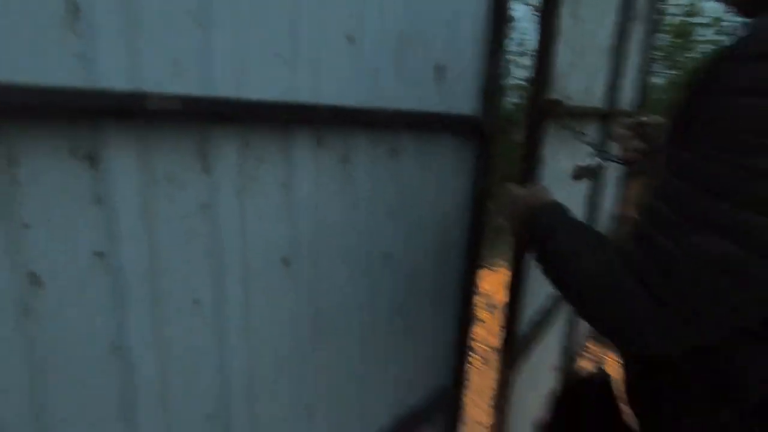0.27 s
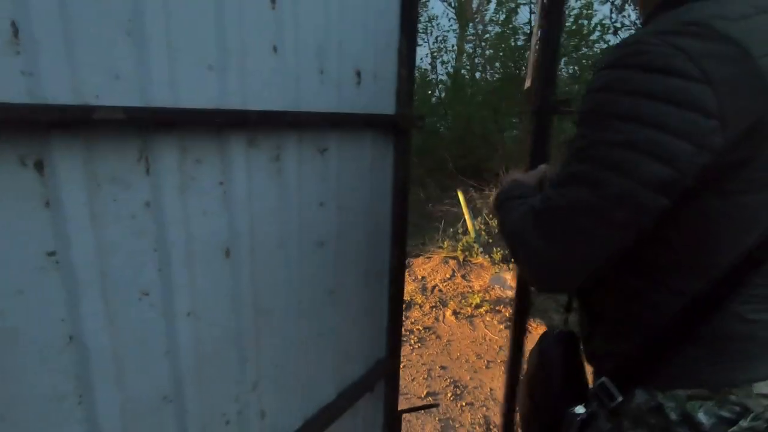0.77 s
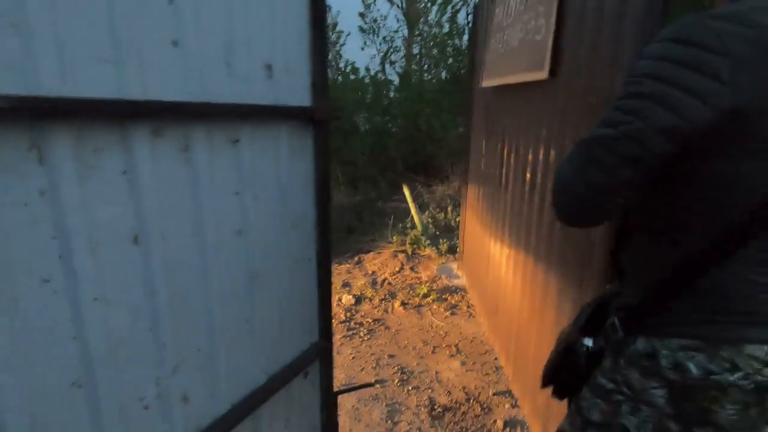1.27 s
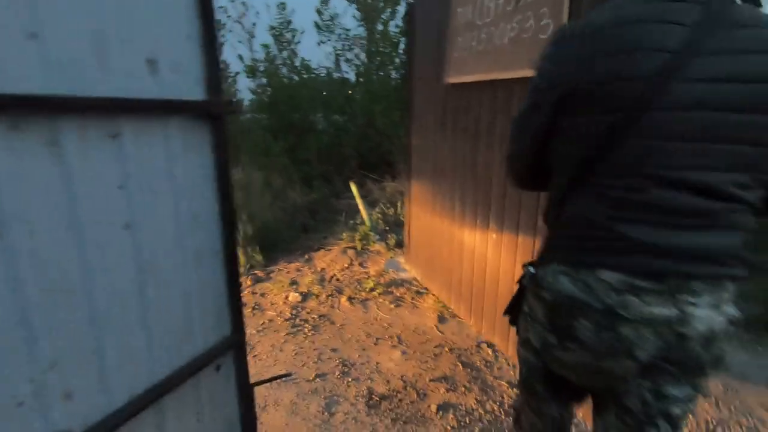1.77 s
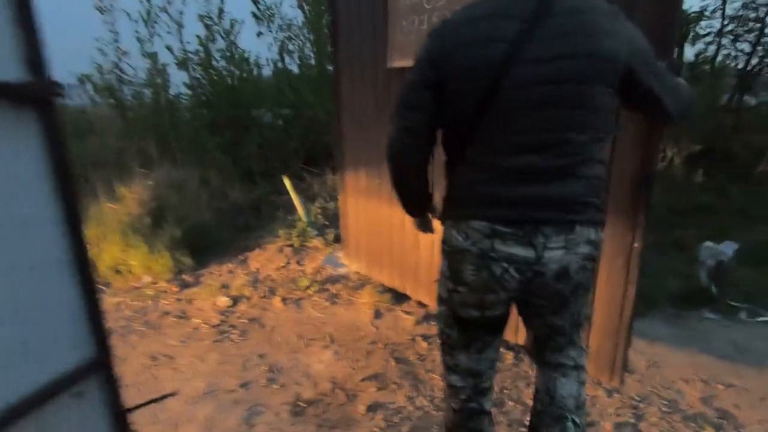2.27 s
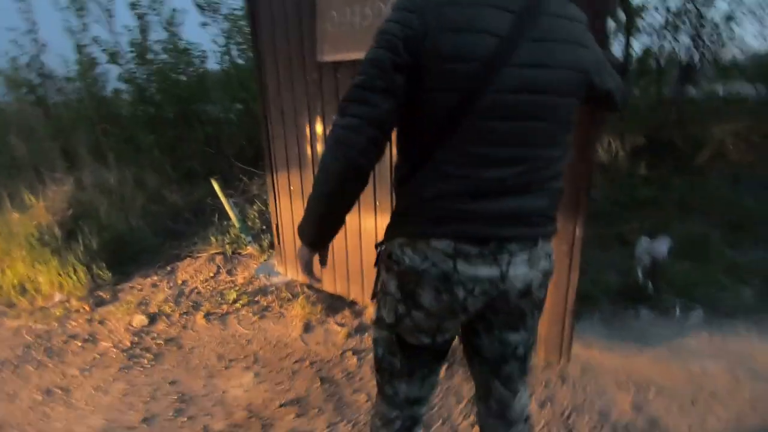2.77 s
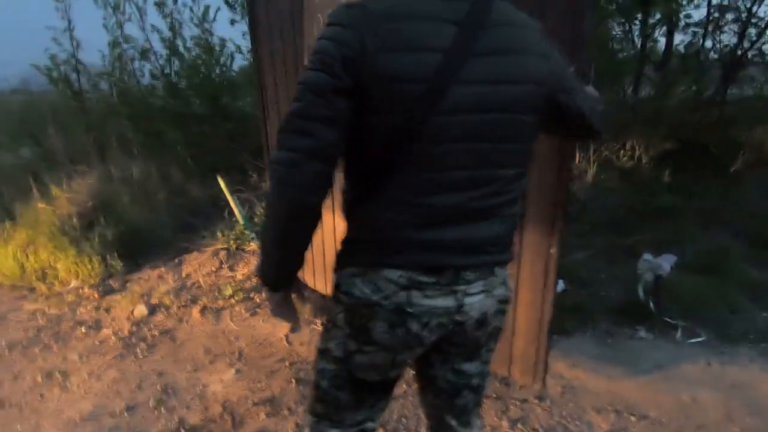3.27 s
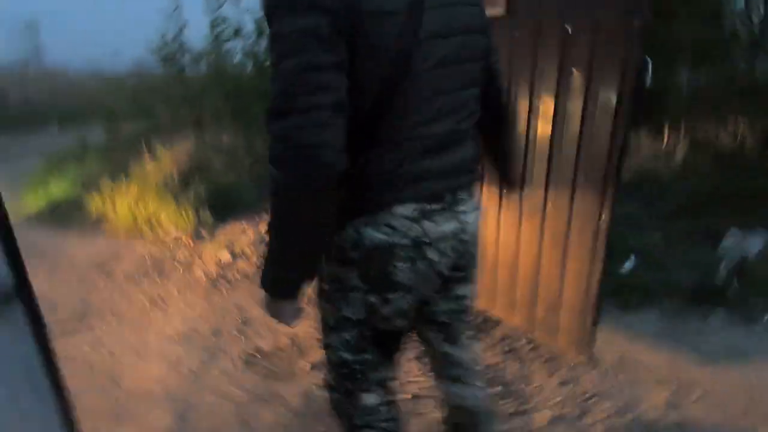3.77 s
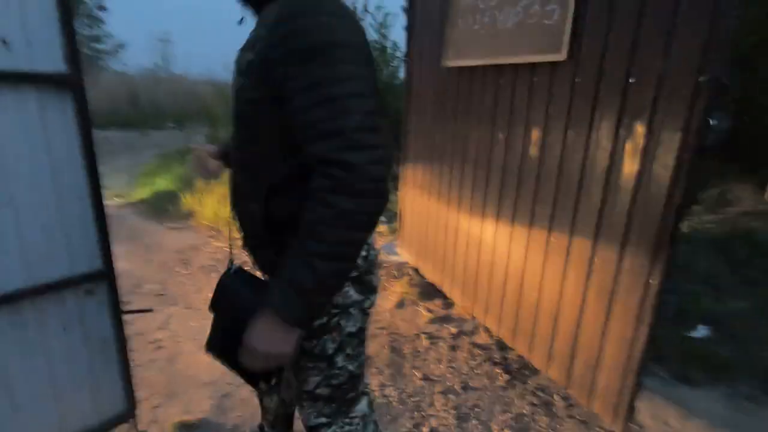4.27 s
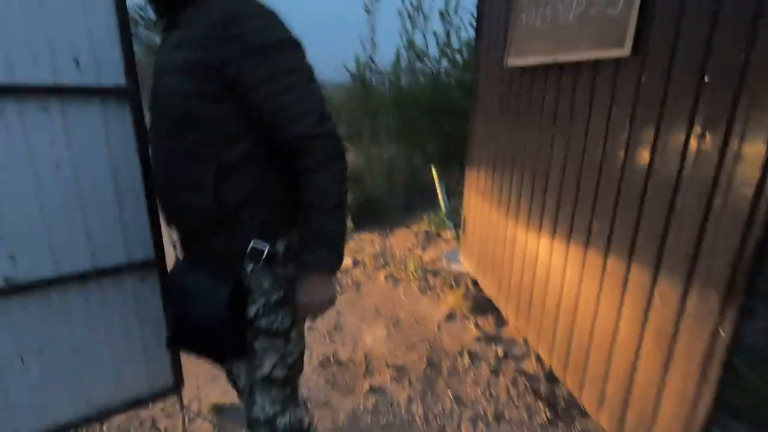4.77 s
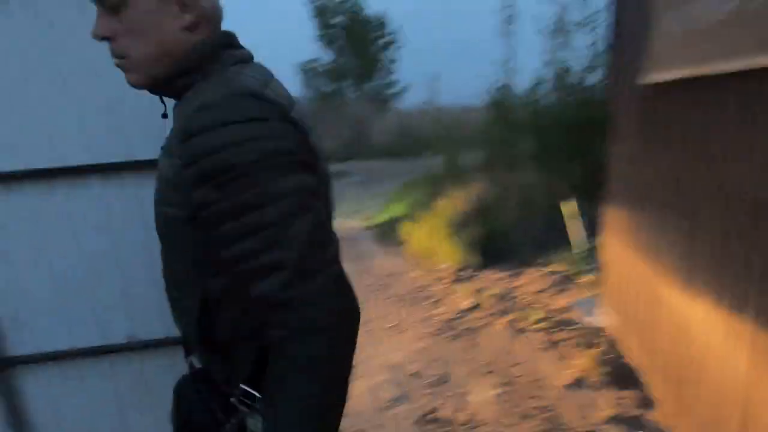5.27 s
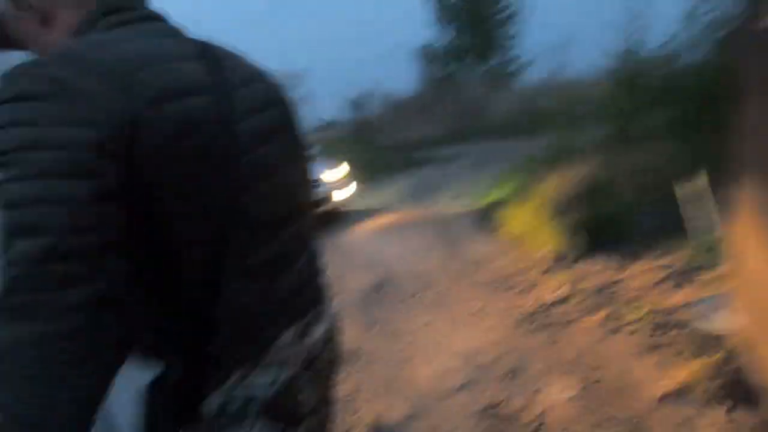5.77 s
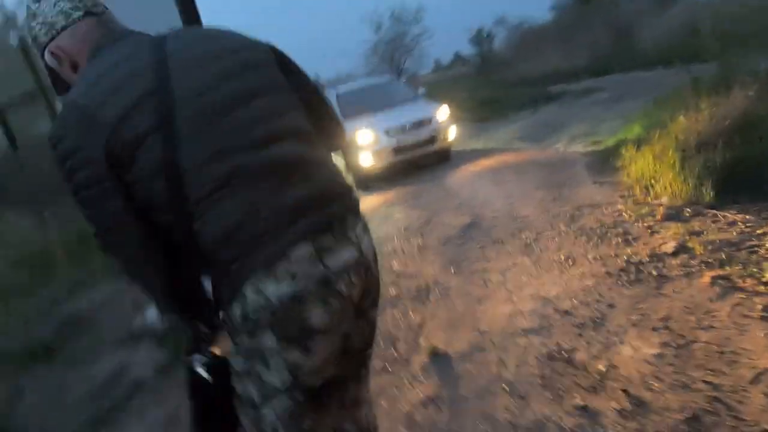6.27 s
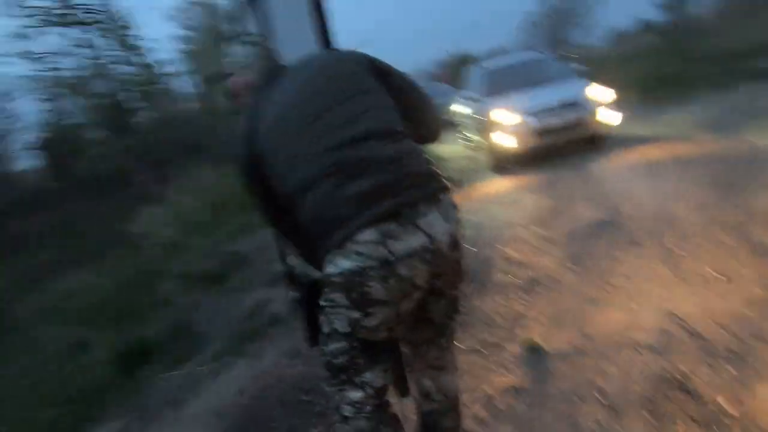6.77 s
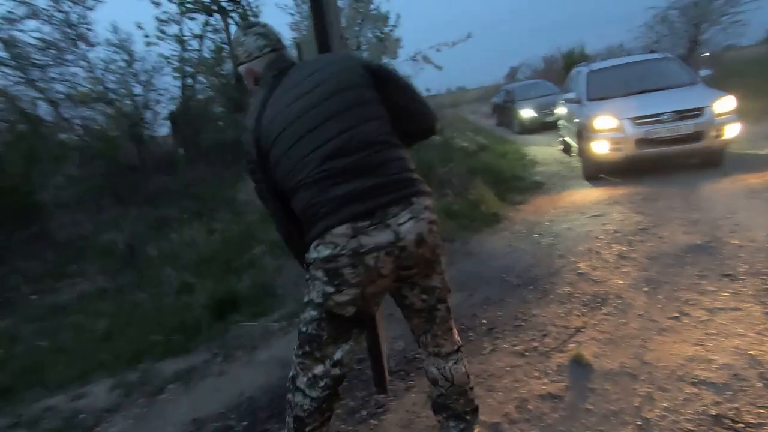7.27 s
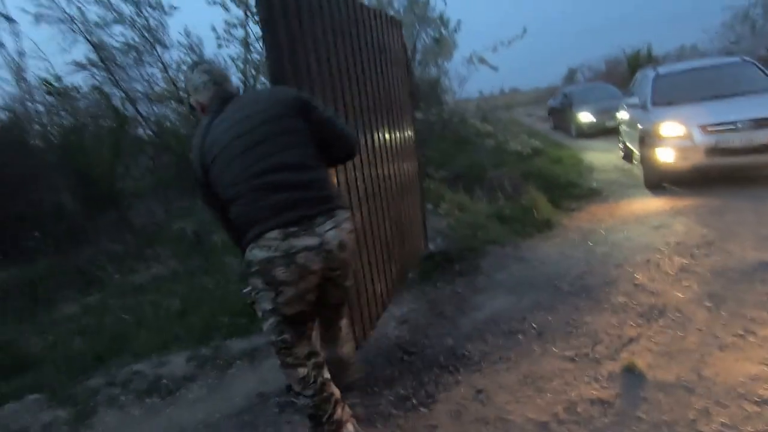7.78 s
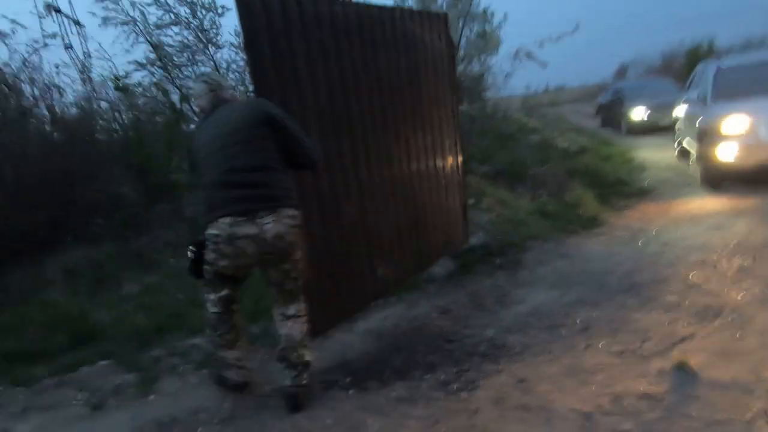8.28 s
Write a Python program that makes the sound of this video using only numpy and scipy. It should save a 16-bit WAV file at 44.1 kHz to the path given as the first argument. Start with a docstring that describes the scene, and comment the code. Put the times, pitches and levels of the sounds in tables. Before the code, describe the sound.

A padlock chinks and a corrugated steel gate bangs, rattles and scrapes open at close range, with low wind buffeting and one brief hinge squeak.

```python
"""A corrugated steel gate is unlocked and pushed open on a gravel track, close to the listener.
Blows and dragging drive its sheet, heard as shaped noise with clusters of decaying modes; ticks and frame thumps join.
A padlock chinks against its chain as beating pairs of modes, and a hinge squeaks once as an unsteady harmonic tone.
Wind buffets the microphone ports as lumpy low noise, over the soft filtered noise of a far outdoor hiss."""
import sys
import numpy as np
from scipy import signal
from scipy.fft import rfft, irfft, next_fast_len
from scipy.io import wavfile
from scipy.ndimage import uniform_filter1d, map_coordinates

SR = 44100
rng = np.random.default_rng(int(sys.argv[2]) if len(sys.argv) > 2 else 0)


def persist_wave(psi):
    """Save psi, clipped to +-1, as 16-bit WAV."""
    counts = np.round(np.clip(psi, -1, 1) * 32767).astype(np.int16)
    wavfile.write(sys.argv[1], SR, np.atleast_2d(counts).T)


N = 376611  # length [samples]
STEP = 16  # spacing of the sheet's band levels [samples]
RISE_S = 0.0025  # contact time of a knock [s]


def amp(db):
    """Decibel definition: the amplitude ratio of a level in dB."""
    return np.exp(np.asarray(db) * (np.log(10) / 20))


def unit(x):
    """Root-mean-square normalisation: scales x to an rms of one."""
    return x / np.sqrt(np.mean(x ** 2) + 1e-20)


def along(points, hz):
    """Logarithmic frequency scale: interpolates (frequency [Hz], value) points at hz."""
    f, v = np.transpose(points)
    return np.interp(np.log(hz + 1), np.log(f + 1), v)


def crossfade(centres, hz):
    """Partition of unity: weights that pass each frequency from one centre to the next."""
    return np.array([along(np.c_[centres, one], hz) for one in np.eye(len(centres))])


def curves(rows):
    """Linear interpolation: one value per sample for each column after the time."""
    s, *cols = np.transpose(rows)
    return [np.interp(np.arange(N) / SR, s, c) for c in cols]


def wobble(rate):
    """Band-limited random modulation: a smooth curve through rate knots a second."""
    knots = rng.standard_normal(int(N * rate / SR) + 4)
    return map_coordinates(knots, [np.arange(N) * rate / SR], order=2)


def filtered(x, response):
    """Linear filtering: multiplies the spectrum of x by a response of frequency."""
    m = next_fast_len(N + SR // 4)
    return irfft(rfft(x, m) * response(np.fft.rfftfreq(m, 1 / SR)), m)[..., :N]


def causal(x, spectrum):
    """Minimum phase: colours x with its energy as early as possible, so that attacks stay sharp."""
    size = 4096
    log_gain = np.log(amp(along(spectrum, np.fft.rfftfreq(size, 1 / SR))) + 1e-6)
    cepstrum = irfft(log_gain)
    # fold the cepstrum onto positive times
    cepstrum[1:size // 2] *= 2
    cepstrum[size // 2 + 1:] = 0
    impulse = irfft(np.exp(rfft(cepstrum)))
    return signal.oaconvolve(x, impulse[None], axes=1)[:, :N]


def panned(db):
    """Interaural level difference: left and right gains for a left-right difference in dB."""
    return amp(np.array([db / 2, -db / 2]))


def wide_noise(width):
    """Partial coherence: white stereo noise with (frequency [Hz], side minus mid level [dB]) points."""
    turn = lambda hz: np.arctan(amp(along(width, hz)))
    weights = lambda hz: np.array([np.cos(turn(hz)), np.sin(turn(hz))])
    mid, side = filtered(rng.standard_normal((2, N)), weights)
    return np.array([mid + side, mid - side])


def placed(sounds):
    """Superposition: sums (start [samples], stereo sound) pairs."""
    out = np.zeros((2, N + SR))
    for at, sound in sounds:
        out[:, at:at + sound.shape[1]] += sound
    return out[:, :N]


def struck(s, hz, level_db, t60, rise_s, pan, spread, scatter_db):
    """Modal superposition: one contact rings decaying modes, with scattered strengths and port phases."""
    t = np.arange(SR // 4, dtype=np.float32) / SR
    hz, level_db, t60 = [np.reshape(v, (-1, 1)).astype(np.float32) for v in (hz, level_db, t60)]
    strength = amp(level_db + rng.normal(0, scatter_db, hz.shape))
    start = strength * np.exp(2j * np.pi * rng.random(hz.shape))
    ports = start.T * np.exp(1j * rng.normal(0, spread, (2, len(hz))))
    rise = 1 - np.exp(-t / (float(rise_s) + 1 / hz))
    fade = np.exp(-float(np.log(1000)) * t / t60) * rise
    turn = float(2 * np.pi) * hz * t
    waves = ports.real @ (fade * np.sin(turn)) + ports.imag @ (fade * np.cos(turn))
    return round(s * SR), panned(pan)[:, None] * waves * (1 - (t / t[-1]) ** 2)


# where the gate stands as the listener turns: (time [s], left-right level difference of a knock [dB])
GATE_BEARING = [(0, 1), (1, -1.5), (2.75, -1.5), (3.2, -2.5), (3.5, -9.5), (3.85, -6), (4.4, -10.5),
                (4.92, -8), (4.97, 1.5), (5.3, 1), (5.75, -2.5), (6.4, -2.5), (6.75, 0), (7.05, -10.5),
                (7.4, -19.5), (7.9, -20.5), (8.3, -10.5), (8.54, -7)]


def bearing(s):
    """Level-difference localisation: left-right dB of a knock at time s."""
    return np.interp(s, *np.transpose(GATE_BEARING))


# boom, clang, sizzle and fizz ranges: (lower edge [Hz], upper edge [Hz])
ZONE_EDGES = [(80, 500), (500, 3000), (3000, 7000), (7000, 15000)]
# colour of the sheet at the microphone: (frequency [Hz], relative level [dB per Hz])
SHEET_SPECTRUM = [(35, -51), (60, -1.5), (129, 3), (183, -1.5), (278, -2.5), (368, -8.5), (480, -12.5),
                  (600, -17), (748, -15), (977, -18), (1410, -17), (2000, -19), (2760, -18.5),
                  (3270, -18.5), (4430, -21), (7390, -16.5), (8500, -22), (13500, -45.5), (15600, -54)]
# stereo width of the sheet: (frequency [Hz], side minus mid level [dB])
SHEET_WIDTH = [(60, -9.5), (130, -9.5), (220, -22.5), (330, -23), (480, -16), (700, -9.5), (1300, -3),
               (2400, -5.5), (4400, -11), (8100, 4.5), (15000, -1)]


def sheet(modes_db, first_t60, first_db):
    """High modal density: countless close modes act as noise in bands, fed by drag and blows."""
    bands = np.geomspace(100, 12800, 8)
    hz = np.arange(SR // 2)
    zone_power = [np.sum(amp(along(SHEET_SPECTRUM, hz[lo:hi])) ** 2) * 2 / SR for lo, hi in ZONE_EDGES]
    zone_db = 10 * np.log10(zone_power)
    middle = [np.sqrt(lo * hi) for lo, hi in ZONE_EDGES]
    share = crossfade(middle, bands).T  # how bands follow zones
    power = drag_power(bands, share, zone_db)
    power += blow_power(bands, share, zone_db, power.shape, first_t60, first_db)

    comb = amp(modes_db * unit(uniform_filter1d(rng.standard_normal(SR), size=30)))  # stronger and weaker modes
    moving = shifting(wide_noise(SHEET_WIDTH), depth_db=1.77)
    noise = unit(filtered(moving, lambda f: comb[f.astype(int)] ** (f / (f + 600))))
    split = filtered(noise, lambda f: crossfade(bands, f)[:, None])
    gain = np.repeat(np.sqrt(power), STEP, axis=2)[..., :N]
    return causal(np.sum(split * gain, axis=0), SHEET_SPECTRUM)


def shifting(x, depth_db, size=1024):
    """Moving excitation point: narrow resonances light up for some tens of milliseconds and fade again."""
    overlap = size * 3 // 4
    z = signal.stft(x, nperseg=size, noverlap=overlap)[2]
    field = rng.standard_normal(z.shape[1:])
    for length, axis in [(4, 0), (6, 1), (4, 1)]:  # smooth over frequency, then twice over time
        field = uniform_filter1d(field, size=length, axis=axis)
    return signal.istft(z * amp(depth_db * unit(field)), nperseg=size, noverlap=overlap)[1][:, :N]


# scraping and shuddering as the gate swings, settles, drags and is carried, before judder:
# (time [s], clang level [dB], boom relative to clang [dB])
DRAG_LEVELS = [(0, -38.5, 4.5), (.19, -59.5, 11), (.47, -46, 12.5), (.72, -40, -0.5), (.93, -36, -7.5),
               (1.14, -28, -8), (1.42, -35, 7.5), (1.6, -32.5, 3), (1.76, -26, -8), (1.85, -35.5, -8),
               (2.09, -34, 2), (2.25, -39.5, 0), (2.68, -40, 1), (2.8, -24, -4.5), (3.02, -39.5, 1.5),
               (3.28, -44.5, -1), (3.4, -32, -13.5), (3.65, -49.5, -5.5), (3.9, -46.5, 1), (4.0, -40, -6),
               (4.23, -36, -4), (4.35, -53, 6), (4.87, -49, 7.5), (4.97, -29.5, -2), (5.0, -21, 0),
               (5.06, -17, 3.5), (5.15, -19, -1), (5.3, -18.5, 1.5), (5.56, -20.5, -5), (5.71, -26.5, -3.5),
               (5.82, -24.5, -6.5), (5.94, -22.5, -8.5), (6.05, -36.5, 2.5), (6.4, -52.5, 9.5),
               (6.66, -53.5, 10), (6.78, -30.5, -3), (6.97, -33.5, -11), (7.14, -46.5, -3),
               (7.4, -35, -17.5), (7.73, -35.5, -5.5), (8.0, -46, -12), (8.44, -36.5, -7), (8.54, -51, 3)]
# treble of the scraping, before judder: (time [s], sizzle level [dB], fizz level [dB])
DRAG_TREBLE = [(0, -60, -84), (.3, -74, -90), (.5, -59, -71), (.8, -56, -62), (1.14, -44.5, -53),
               (1.45, -42.5, -50), (1.85, -42, -54), (2.2, -50.5, -46.5), (2.68, -46.5, -59.5),
               (2.8, -41.5, -61), (3.0, -70, -71), (3.2, -63, -58), (3.65, -57.5, -67), (3.99, -62, -65),
               (4.07, -28.5, -60), (4.3, -62.5, -64), (4.96, -62, -76), (5.0, -25.5, -56),
               (5.4, -22.5, -44), (5.71, -36.5, -63), (5.82, -31.5, -49), (5.94, -34, -62),
               (6.05, -52.5, -93), (6.3, -59, -59), (6.66, -65, -65), (6.78, -38.5, -47), (6.97, -57, -63),
               (7.2, -65, -53.5), (7.42, -46, -44.5), (7.75, -50.5, -47), (8.0, -55.5, -59.5),
               (8.3, -56, -54.5), (8.54, -63, -54)]
SPREAD = 0.36  # scraping comes from the whole leaf, so it takes this share of a knock's bearing


def drag_power(bands, share, zone_db):
    """Sustained friction: the scraping feeds each band a slowly varying power, roughened by judder."""
    tracks = curves(DRAG_LEVELS) + curves(DRAG_TREBLE) + curves(GATE_BEARING)
    clang, boom, sizzle, fizz, pan = np.array(tracks)[:, ::STEP]
    band_db = share @ (np.array([clang + boom, clang, sizzle, fizz]) - zone_db[:, None])
    power = amp(2 * band_db)[:, None] * panned(2 * SPREAD * pan)  # doubled dB turns amplitude into power
    rough = judder(bands, len(pan), rate=260, depth_db=1.2, colour_db=4.3, t60=.05, bed=.45)
    return power * rough[:, None]


def judder(bands, size, rate, depth_db, colour_db, t60, bed):
    """Stick-slip friction: random small knocks, each of its own colour, give a power gain per band."""
    draws = rng.standard_normal((int(rate * N / SR), len(bands) + 1))
    strength_db = depth_db * draws[:, :1] + colour_db * draws[:, 1:]
    knocks = np.zeros((len(bands), size))
    knocks[:, rng.integers(0, size, len(draws))] = amp(2 * strength_db).T
    fading = signal.lfilter([1], [1, -amp(-2 * 60 * STEP / (t60 * SR))], knocks)
    return bed + (1 - bed) * fading / fading.mean()


# strength of the wind before gusts: (time [s], buffet level [dB])
WIND_LEVELS = [(0, -32.5), (.4, -43), (.95, -39), (1.07, -55), (1.24, -32), (1.54, -27.5), (2.02, -33.5),
               (2.3, -45), (2.5, -29), (2.68, -44), (2.78, -31), (3.16, -49), (3.61, -57), (3.95, -48),
               (4.09, -25.5), (4.33, -39.5), (4.8, -22.5), (4.95, -33), (5.05, -23), (5.5, -34),
               (5.99, -38.5), (6.4, -30), (7.04, -27), (7.28, -29), (7.6, -38.5), (7.97, -37.5),
               (8.09, -32.5), (8.54, -44)]
# colour of the buffeting: (frequency [Hz], relative level [dB per Hz])
BUFFET_SPECTRUM = [(8.8, -27), (15, 6), (60, 3), (114, -3.5), (204, -16), (258, -18), (500, -43),
                   (650, -51), (1100, -120)]
GUST_DB, GUSTS_PER_S = 4, 9  # gust depth [dB], random knots per second


def wind():
    """Turbulent pressure: eddies thump the ports in lumps, partly unlike at each."""
    lumps = amp(1.1 * np.array([wobble(15), wobble(14)]))
    noise = wide_noise([(20, 0), (60, -4), (150, 0), (400, -6)])
    rumble = filtered(noise, lambda hz: amp(along(BUFFET_SPECTRUM, hz)))
    return amp(curves(WIND_LEVELS)[0] + GUST_DB * wobble(GUSTS_PER_S)) * unit(lumps * rumble)


# colour of the far hiss: (frequency [Hz], relative level [dB per Hz])
AIR_SPECTRUM = [(59, -27), (100, -14), (149, 0), (438, -9), (498, 3), (1310, -7), (2810, -7), (6970, -20),
                (10500, -28.5), (15600, -62)]
AIR_DB = -53  # level about which the hiss drifts [dB]


def air():
    """Incoherent summation: far leaves and idling engines blur into a soft hiss."""
    noise = wide_noise([(100, -14), (1000, -3), (8000, -4.0)])
    hiss = filtered(noise, lambda hz: amp(along(AIR_SPECTRUM, hz)))
    return amp(AIR_DB + wobble(3.01)) * unit(hiss)


# knocks on the gate: (time [s], nominal clang peak [dB], boom re clang [dB], sizzle re clang [dB],
# fizz re clang [dB], ring time factor [1], struck patch frequency [Hz])
BLOW_EVENTS = [(0.093, -32.5, -6, 5, -0.5, 0.8, 2340), (0.113, -28, -1, 8.5, -13, 0.67, 2510),
               (0.303, -13.5, -5.5, -2, -35, 0.7, 3000), (0.562, -36.5, 5, 6, -24, 0.38, 3300),
               (0.625, -43.5, -5, 1, -12, 0.46, 5970), (0.673, -32, -1, -9, -14, 0.69, 2320),
               (0.757, -19, -18, -24, -32, 0.73, 1816), (0.863, -25, -12, -10, -23, .99, 1360),
               (0.95, -24.5, -11, -8, -18, .7, 1650), (1.071, -27.5, -12, 3, -17, 0.88, 2680),
               (1.097, -13, -12, -13, -17, 0.55, 1355), (1.167, -16, -4, -10, -27, .99, 1196),
               (1.258, -27, -11, 10, -15, 0.41, 2510), (1.292, -13.5, -11, -16, -20, 0.82, 1056),
               (1.346, -6.5, -13, -7, -25, 0.59, 2720), (1.418, -16.5, -13, -8, -19, 1, 1735),
               (1.451, -19, -15, -3, -20, .4, 2400), (1.507, -29.5, -3, 8, 4, 0.46, 4500),
               (1.532, -17, -11, -20, -30, 0.65, 1296), (1.558, -24, -10, 0, -15, 0.44, 4200),
               (1.604, -15, 2, -16, -20, 0.75, 979), (1.695, -26, -10, 0, -20, 0.59, 2030),
               (1.766, -18, -5, -2, -21, 0.9, 1285), (1.778, -15.5, -7, 6.5, -21, 0.39, 3530),
               (1.789, -24, -7, 4, -8, .5, 2880), (1.84, -26.5, -5, 2, -22, 0.52, 3020),
               (1.939, -16, -3, -18, -22, .99, 1404), (2.045, -34, -6, 1, -21, .51, 3680),
               (2.054, -30, -10, 5, -20, .4, 3630), (2.1, -19.5, 2.5, -9, -33, .99, 1444),
               (2.167, -22, -1, -9, -8, 0.5, 4250), (2.199, -29.5, -1, 4, 10, 0.62, 1496),
               (2.214, -31.5, -3, 8, 12.5, 0.52, 1500), (2.387, -35.5, -12, 8, -10, 0.99, 3670),
               (2.754, -5.5, -30, -13, -51, 0.51, 1740), (2.812, -10, -20, -10.5, -55, 0.79, 1712),
               (2.929, -27, -21, -30, -39, .99, 1650), (3.023, -11.5, -3.5, -11.5, -35, 0.76, 1550),
               (3.145, -37, -15, 3, -20, .4, 4200), (3.176, -32.5, -6, 0, 0, 0.63, 1500),
               (3.288, -37, -17, 0, -21, .82, 1510), (3.366, -38, -15, 4, -14, 0.66, 5000),
               (3.406, -20.5, -19, -25, -37, 0.32, 1746), (3.602, -34, -19, -22, -34, 0.58, 1120),
               (3.826, -14.5, -14, -9, -40, 0.52, 1910), (4.001, -26, -21, 7, -16, 0.28, 1720),
               (4.049, -9, -18, -7, -14, .99, 1674), (4.167, -23, -17, -6, -8, 0.38, 1500),
               (4.281, -27, -24, -29, -38, 0.78, 1450), (4.344, -26, -10, -14, -36, 0.5, 1660),
               (4.897, -17, -15, -2.5, -46, 0.71, 1512), (4.908, -10.5, -22, -23, -45, 0.41, 1710),
               (4.976, -14, -8, 3.5, -21, 0.96, 3570), (5.122, -18, -5, -13, -30, .5, 1780),
               (5.17, -20, -9, -11, -29, 0.97, 2940), (5.28, -13, -9, 8, -21, 0.34, 3560),
               (5.36, -14, -13, -1, -11, 0.54, 1570), (5.51, -16.5, -8, 6, -16, 1, 2750),
               (5.686, -28, -8, -9, -27, .5, 1360), (5.738, -20, 0, -4, -28, 0.93, 4830),
               (5.798, -19.5, -9, 6, -11, .48, 2170), (5.89, -19, -1, -1, -28, 0.74, 1490),
               (5.961, -25, -8, -5, -30, 0.74, 2030), (6.25, -40, -8, -8, -22, .4, 1500),
               (6.295, -33, -10, -13, -22, .4, 1500), (6.314, -41, -10, -10, -22, .4, 1600),
               (6.365, -46, 0, 8, -8, .3, 5000), (6.611, -19.5, -24, -8.5, -50, 1, 1473),
               (6.729, -16.5, -6, 3, -22, .5, 922), (6.733, -14, -7, -1.5, -17.5, 0.79, 2560),
               (6.846, -29.5, -20, -15, -35, .6, 2510), (6.888, -23, -20, -4, -35, 0.63, 2820),
               (6.932, -24.5, -9, 4, -45, 0.65, 2310), (7.043, -20.5, -26, -24, -42, 0.7, 1223),
               (7.132, -30.5, -17, -4, 1, 0.77, 4160), (7.209, -29.5, -12, -11, -18, 1, 1210),
               (7.28, -39, -12, -3, -20, 0.45, 2510), (7.337, -30.5, -27, -15, -27, .99, 970),
               (7.461, -27.5, -25, -5.5, 0, 0.74, 4300), (7.754, -31.5, -26, -6, 7, .49, 1810),
               (7.974, -25.5, -42, -23, -35, .58, 1296), (8.323, -15.5, -7, 0.5, -13, 0.64, 1558),
               (8.45, -38, -19, -15, -21, .49, 1400), (8.529, -29, -23, -8, -28, 0.56, 1950)]
# decay of the sheet at a ring time factor of one: (frequency [Hz], t60 [s])
RING_TIMES = [(100, 0.51), (300, 0.59), (800, 1), (2000, 0.46), (5000, 0.27), (12000, 0.26)]
# the top treble of a knock scatters and leans aside less: (frequency [Hz], share of the bearing [1])
TREBLE_LEAN = [(4000, 0.98), (10000, 0.18)]
CREST_DB = 9.5  # peak of a knock over its rms [dB]


def blow_power(bands, share, zone_db, shape, first_t60, first_db):
    """Impact excitation: each blow feeds all bands at once, a brief crack and a tail that decays per band."""
    power = np.zeros(shape)
    t = np.arange(0, SR // 3, STEP) / SR
    crack = amp(first_db - 60 * t / first_t60)
    rise = 1 - np.exp(-t / (RISE_S + 1 / bands[:, None]))  # slower by one cycle of the band
    for s, db, boom, sizzle, fizz, factor, _ in BLOW_EVENTS:
        level = share @ (db - CREST_DB + np.array([boom, 0, sizzle, fizz]) - zone_db)
        tail = amp(-60 * t / (factor * along(RING_TIMES, bands))[:, None])
        envelope = amp(level)[:, None] * rise * (tail + crack)
        sides = panned(2 * bearing(s) * along(TREBLE_LEAN, bands)).T
        at = round(s * SR / STEP)
        added = envelope[:, None] ** 2 * sides[..., None]
        power[..., at:at + len(t)] += added[..., :shape[-1] - at]
    return power


PATCH_DB, PATCH_DB_PER_OCTAVE, PATCH_MID_HZ = -28, 1, 1500  # re clang at the mid pitch; higher ones stand out


def patches(width, overtone, overtone_db, count=16):
    """Local resonance: the struck corrugation rings as close modes about its own pitch and an overtone."""
    for s, db, *_, factor, hz in BLOW_EVENTS:
        place = 2 * (np.arange(count) + rng.random((2, count))) / count - 1
        cluster = hz * np.exp(width * place) * [[1], [overtone]]
        centre_db = db + PATCH_DB + PATCH_DB_PER_OCTAVE * np.log2(hz / PATCH_MID_HZ)
        level = centre_db - 6 * place ** 2 + [[0], [overtone_db]]
        level[1] -= 14 * max(0, np.log2(overtone * hz / 3500))  # stiff high overtones are hardly driven
        t60 = 0.99 * factor * along(RING_TIMES, cluster)
        yield struck(s, cluster, level, t60, RISE_S / 2, bearing(s), spread=0.59, scatter_db=4)


# padlock contacts: (time [s], drive level [dB], left-right level difference [dB],
# ring time factor [1], boost of the modes above 10 kHz [dB])
PADLOCK_CHINKS = [(0.113, -31, 0, .45, 0), (2.1985, -17, 2, 1, 0), (2.2118, -11, 0, 1, 0),
                  (3.1757, -31, 2, 0.66, 12), (3.2875, -29, -3.0, 1, 8), (3.825, -32, 1, 1.4, 0),
                  (4.166, -21.5, -1, 1.13, 0), (8.449, -47, -5, .5, 31)]
# modes of the padlock and chain at a ring time factor of one: (frequency [Hz], relative level [dB], t60 [s])
PADLOCK_MODES = [(5641, -3, .2), (5706, -4, .28), (5836, 0, .15), (6060, -4, .13), (6160, -6, .1),
                 (6400, -9, .08), (6674, -7, .11), (6900, -11, .1), (7327, -9, .1), (7600, -13, .07),
                 (8950, -22, .06), (12085, -38, .2), (12480, -38, .2), (12900, -41, .15)]


def padlock():
    """Beating of close modes: body, shackle and links chink together, every mode a slightly split pair."""
    hz, level, t60 = np.repeat(PADLOCK_MODES, repeats=2, axis=0).T
    for s, db, pan, factor, tinkle_db in PADLOCK_CHINKS:
        split = hz * (1 + .004 * rng.standard_normal(len(hz)))
        mode_db = db + level - 14 + tinkle_db * (hz > 10000)
        yield struck(s, split, mode_db, factor * t60, 0.00086, pan, spread=0.9, scatter_db=4.5)


# knocks that leave a band of the steel ringing: (time [s], nominal level of a central mode [dB],
# centre frequency [Hz], half width as a log-frequency ratio [1], typical t60 [s])
SINGING_BANDS = [(.113, -46, 2550, .18, 0.41), (.113, -45, 6000, .15, 0.16), (.304, -45, 3066, 0.094, 0.57),
                 (.304, -45, 1900, 0.18, .35), (.304, -42, 5450, 0.043, .1), (.757, -43, 1915, 0.43, 0.27),
                 (1.095, -37.5, 1150, .4, 0.38), (1.167, -40.5, 896, 0.43, 0.37),
                 (1.167, -45, 4250, .05, .2), (1.258, -37, 2540, 0.11, 0.15), (1.292, -39, 808, 0.44, 0.37),
                 (1.292, -37, 2850, 0.14, 0.16), (1.42, -46, 4300, .05, .25), (1.507, -46, 4300, .05, .2),
                 (1.604, -46, 4350, 0.047, .2), (1.604, -39.5, 648, 0.38, 0.4),
                 (1.94, -42.5, 1103, 0.42, 0.33), (2.044, -41, 3500, 0.13, 0.14),
                 (2.046, -41, 5000, 0.15, 0.11), (2.1, -43.5, 5100, 0.085, 0.17),
                 (2.165, -44, 4300, 0.031, .15), (2.212, -41.5, 3050, .03, 0.11),
                 (2.754, -29.5, 1680, 0.19, 0.4), (2.758, -35, 3450, 0.088, .12),
                 (2.812, -33, 1675, .2, .3), (2.815, -40, 1665, 0.086, 0.75), (2.812, -31, 3400, 0.092, .1),
                 (2.812, -43, 5400, .1, .1), (3.022, -35, 4360, 0.23, 0.092),
                 (3.027, -31, 1448, 0.33, 0.25), (3.031, -40.5, 1666, 0.075, .5),
                 (4.05, -40, 519, 0.17, 0.36), (4.905, -36, 1905, 0.32, 0.086),
                 (6.612, -42, 1496, 0.075, .15), (6.734, -37.5, 2535, .14, 0.61),
                 (6.733, -35, 998, 0.37, 0.29), (6.733, -36, 4300, 0.098, .15),
                 (4.978, -33, 4200, 0.28, .15), (6.886, -44, 3140, 0.053, .12), (6.935, -46, 2510, .2, 0.3),
                 (8.323, -37, 1504, 0.22, 0.55), (8.322, -32, 2110, .1, 0.13),
                 (8.33, -43, 2910, 0.13, 0.56)]


def singing(count=24):
    """Free vibration: a dense cluster of modes, each with its own decay, rings on after some knocks."""
    for s, db, hz, width, t60 in SINGING_BANDS:
        place = 2 * (np.arange(count) + rng.random(count)) / count - 1
        cluster = hz * np.exp(width * place)
        decays = t60 * amp(rng.normal(0, 2.5, count))
        yield struck(s, cluster, db - 6 * place ** 2, decays, RISE_S, bearing(s), spread=0.5, scatter_db=2.5)


# short dry cracks at the contact of knocks, and a few lone ticks:
# (time [s], nominal level [dB], main frequency [Hz])
TICK_EVENTS = [(0.303, -16, 3100), (1.346, -9, 2840), (1.167, -26, 4150), (1.292, -17, 2840),
               (1.419, -24, 4280), (1.451, -24, 2400), (1.507, -23, 4360), (1.604, -28, 4350),
               (1.953, -25, 2060), (2.167, -24, 4300), (1.258, -22, 2520), (2.048, -28, 3340),
               (2.1, -20, 872), (2.1, -26, 5040), (2.926, -32, 5400), (2.992, -45, 5400), (2.756, -4, 1830),
               (2.762, -19, 3000), (2.811, -17, 3480), (2.817, -5, 1750), (2.928, -23, 1660),
               (3.603, -28, 1100), (3.658, -39, 802), (3.827, -13, 1930), (4.051, -10.5, 1380),
               (4.28, -23.5, 1290), (4.298, -31, 872), (4.343, -27, 1690), (4.379, -24, 1510),
               (4.418, -28, 1550), (5.285, -8, 3400), (6.732, -10, 1380), (6.82, -24, 2700),
               (6.889, -25, 3130), (6.932, -25, 2290), (7.053, -32, 1230), (7.215, -34, 1340),
               (7.338, -35, 960), (7.868, -30, 1340), (7.977, -31, 1550), (8.049, -34, 1310),
               (8.05, -42, 5500), (8.324, -9, 1680), (8.449, -35, 1400)]


def ticks():
    """Heavy damping: a hard point contact rings four broad modes for 11 cycles plus 2.4 ms each."""
    for s, db, hz in TICK_EVENTS:
        modes = hz * np.array([.7, 1, 1.5, 2.3])
        level = db + np.array([-7, 0.5, -6.0, -13.0])
        yield struck(s, modes, level, 11 / modes + 0.0024, 0, bearing(s), spread=0.28, scatter_db=0.0)


# thumps of the tube frame: (time [s], nominal level [dB], lowest frequency [Hz], t60 less 10 ms [s])
FRAME_THUMPS = [(1.346, -23.5, 100.5, 0.19), (1.51, -16, 59, 0.22), (1.555, -18, 70, .15),
                (1.604, -22, 125, 0.23), (1.94, -29, 74, .14), (2.103, -20.5, 229, 0.27),
                (2.753, -21.5, 168, 0.28), (3.028, -25.5, 163, 0.21), (4.05, -23, 220, 0.15),
                (4.971, -30, 170, .13), (5.019, -12.5, 129, 0.12), (5.059, -12, 118, .12),
                (5.087, -9.5, 140.6, 0.14), (5.225, -18, 162, .12), (5.284, -11, 125, 0.13),
                (5.36, -16, 204, .12), (6.379, -18, 100, 0.075), (6.66, -25, 70, .2),
                (6.715, -16.5, 70, .12), (6.845, -20, 110, 0.089), (6.732, -24, 95.5, 0.27),
                (6.934, -16, 75.3, 0.1), (7.047, -24, 71, .19), (8.095, -22.5, 72.8, .14),
                (8.326, -9.5, 152, .069)]


def frame():
    """Bending vibration: the tube frame flexes in a low thump with stiffer overtones."""
    for s, db, hz, t60 in FRAME_THUMPS:
        modes = [hz, 1.35 * hz, 1.6 * hz]
        level = db + np.array([0, -4, -2.5])
        yield struck(s, modes, level, t60 + .01, 0.00084, 0, spread=.6, scatter_db=0.5)


# the squeak before its random flutter: (time [s], pitch [Hz],
# relative levels of partials 1, 2 and 3 [dB], [dB], [dB])
HINGE_SQUEAK = [(7.855, 1325, -55, -65, -74), (7.868, 1320, -40, -48, -64), (7.89, 1300, -41, -43.5, -56),
                (7.915, 1295, -49, -38, -60), (7.94, 1263, -41, -51, -68), (7.98, 1292, -47, -45, -71),
                (8.004, 1314, -38, -46, -54), (8.02, 1310, -47, -50, -58), (8.04, 1330, -47, -49, -70),
                (8.085, 1325, -54, -55, -74), (8.13, 1320, -54, -62, -72), (8.15, 1320, -59, -68, -74)]


def hinge():
    """Stick-slip oscillation: dry steel slips in a fast, unsteady train, a rough pitch with overtones."""
    t = np.arange(N) / SR
    start, end = HINGE_SQUEAK[0][0], HINGE_SQUEAK[-1][0]
    pitch, *levels = curves(HINGE_SQUEAK)
    unsteady = pitch * (1 + .006 * wobble(40) + .022 * wobble(300))
    phase = 2 * np.pi * np.cumsum(unsteady) / SR
    on = np.clip(np.minimum(t - start, end - t) / .01, 0, 1)
    tone = np.zeros(N)
    for partial, db in enumerate(levels, start=1):
        tone += amp(db + 4.0 + 3.2 * wobble(70) + 3 * wobble(400)) * np.sin(partial * phase)
    return on * tone * panned(-9)[:, None]


# the gate reaches the left port later once it swings out right: (time [s], delay [s])
LEFT_DELAY = [(6.8, 0), (7.1, .00025)]


def scene():
    """Superposition with an arrival-time difference: the gate's left side is delayed, the rest is added."""
    gate = sheet(modes_db=2.5, first_t60=0.024, first_db=4)
    gate += placed(patches(width=.4, overtone=2.05, overtone_db=-10.0))
    gate += placed(singing()) + placed(ticks()) + placed(frame()) + hinge()
    left, right = gate
    late = np.interp(np.arange(N) - SR * curves(LEFT_DELAY)[0], np.arange(N), left)
    return np.array([late, right]) + wind() + air() + placed(padlock())


TOP_HZ = 15708  # band limit [Hz]


def record(dry):
    """Soft saturation and band limiting: the input stage rounds the highest peaks and cuts the top."""
    rounded = dry / (1 + np.abs(dry / .85) ** 4) ** (1 / 4)
    return filtered(rounded, lambda hz: hz < TOP_HZ)


dry = scene()
out = record(dry)
persist_wave(out)
```